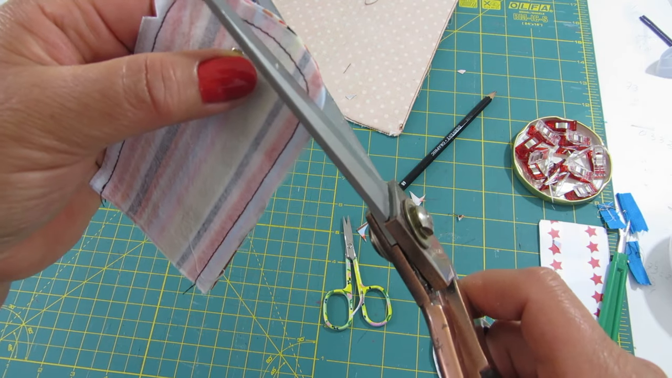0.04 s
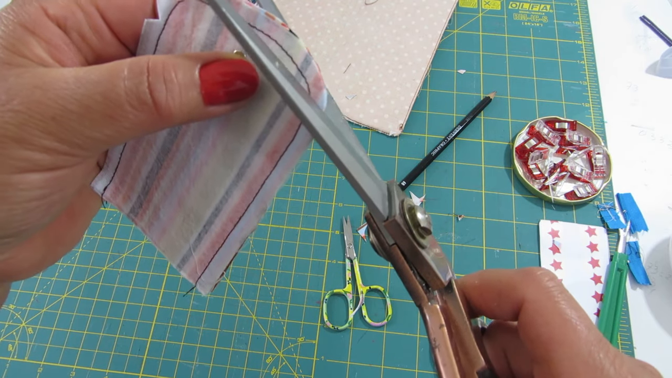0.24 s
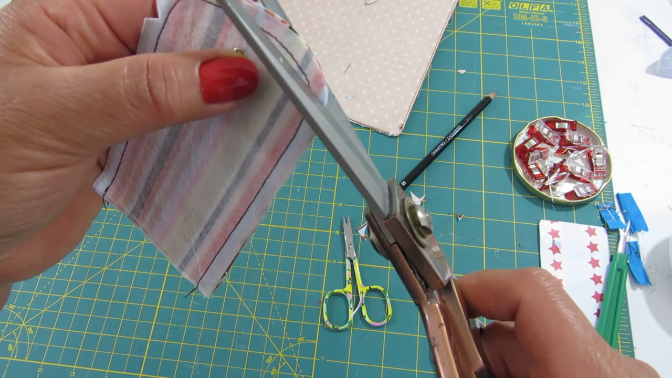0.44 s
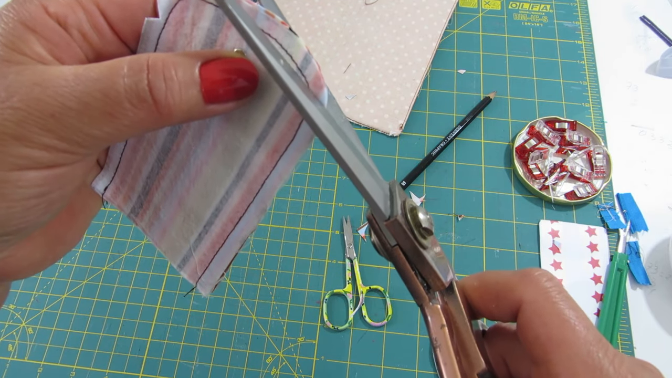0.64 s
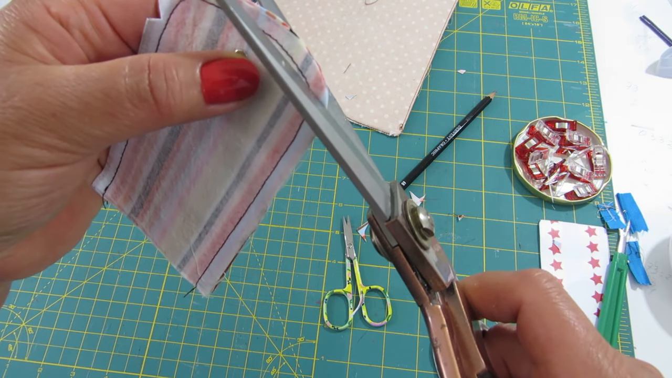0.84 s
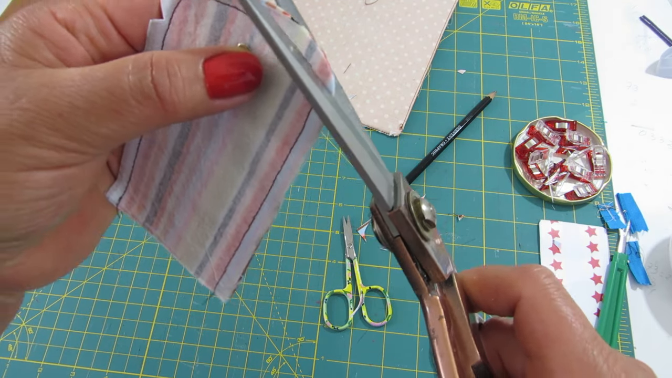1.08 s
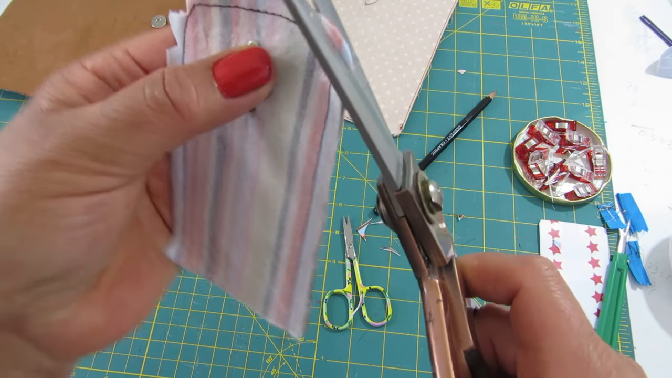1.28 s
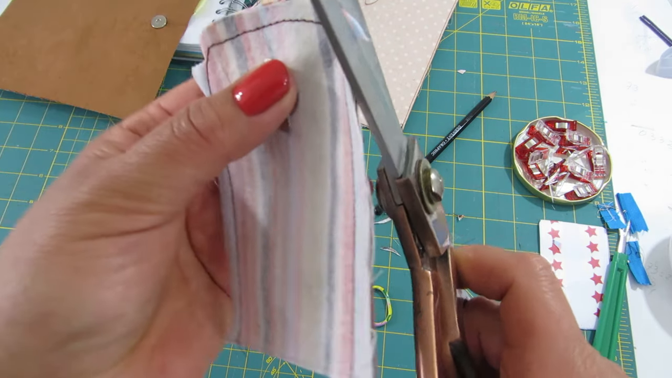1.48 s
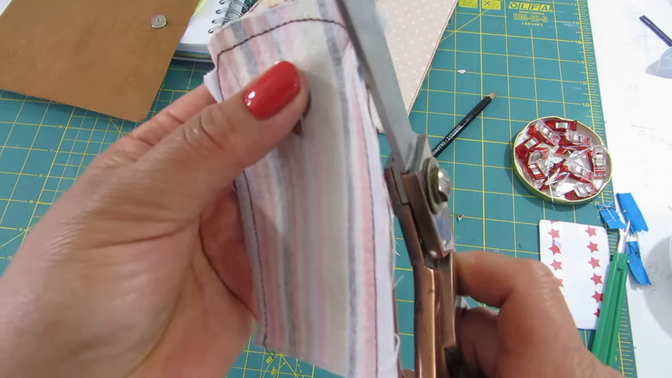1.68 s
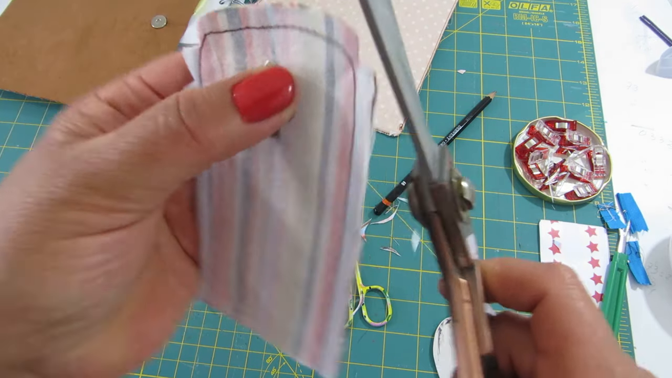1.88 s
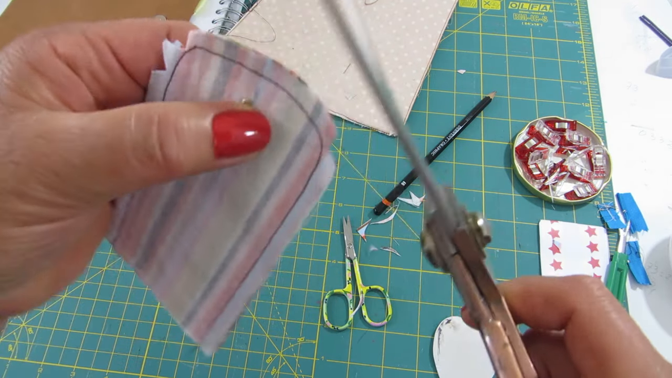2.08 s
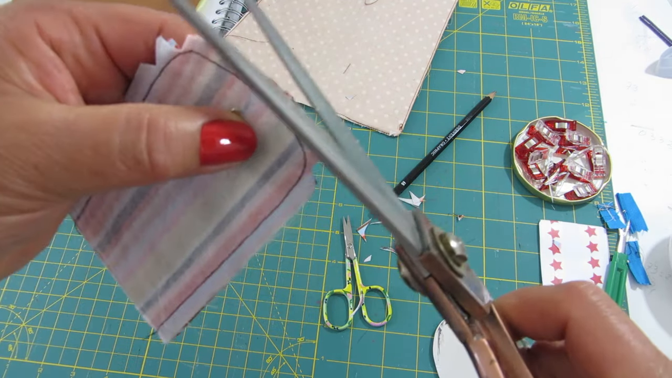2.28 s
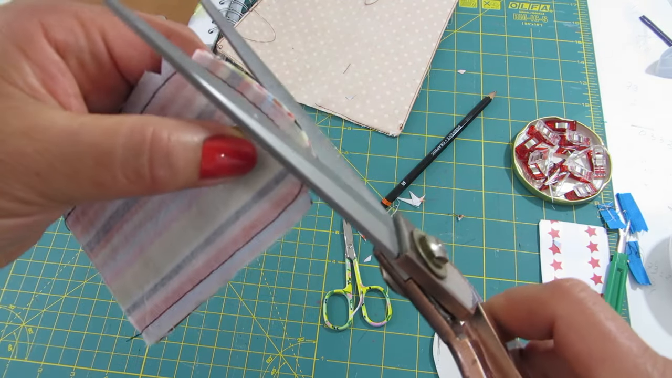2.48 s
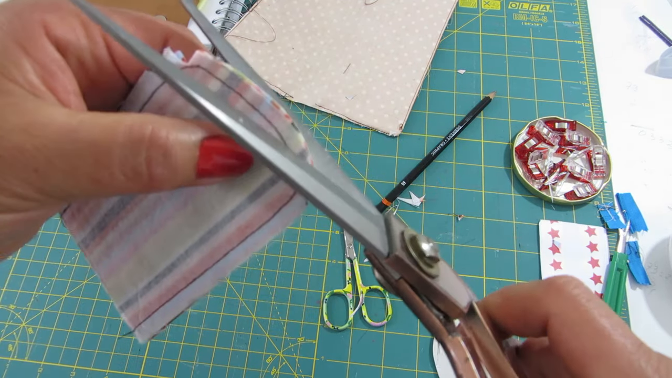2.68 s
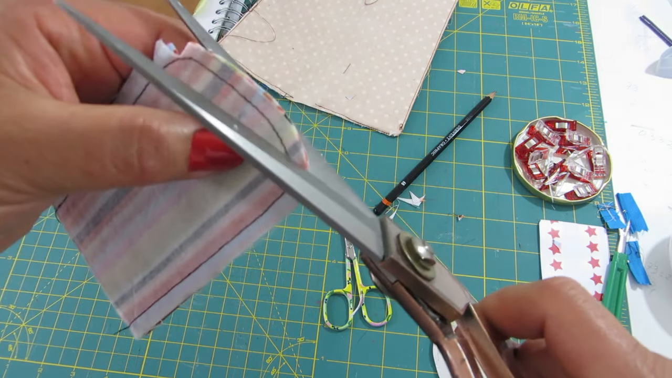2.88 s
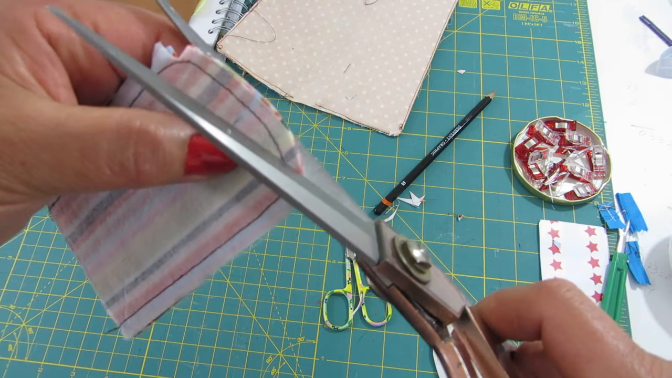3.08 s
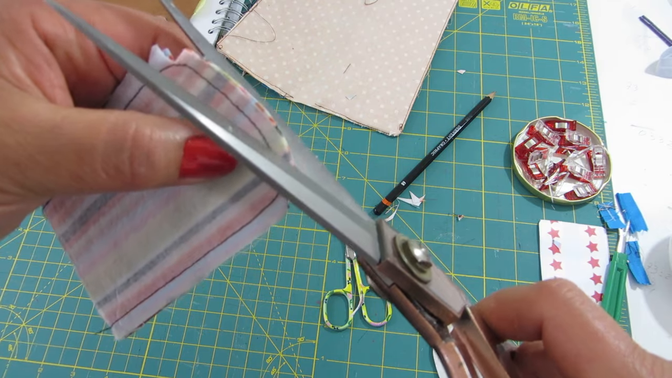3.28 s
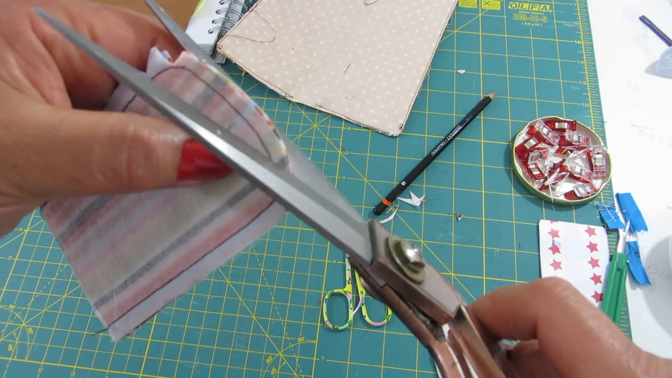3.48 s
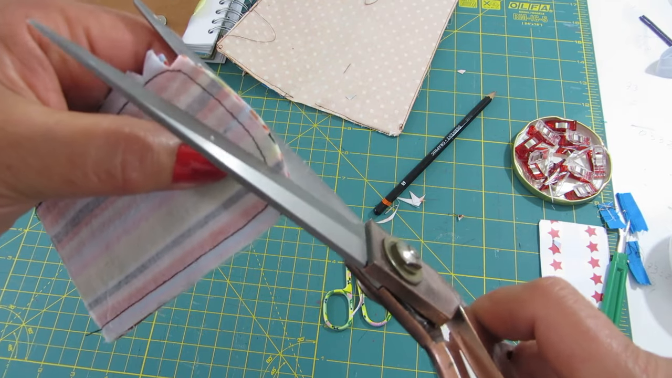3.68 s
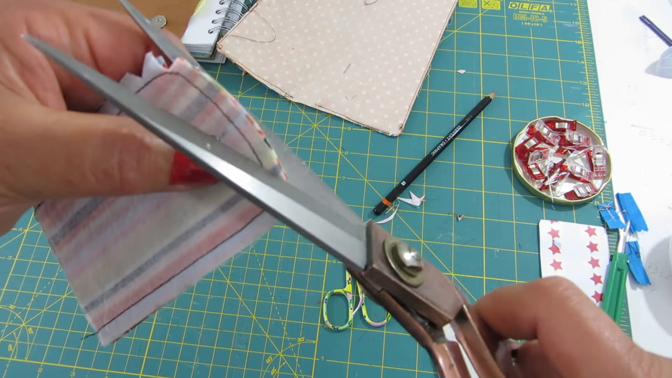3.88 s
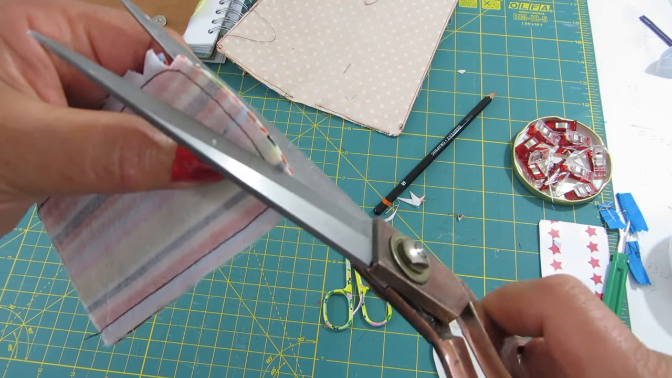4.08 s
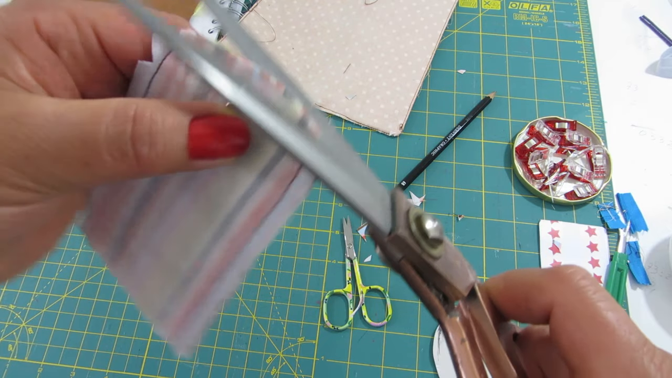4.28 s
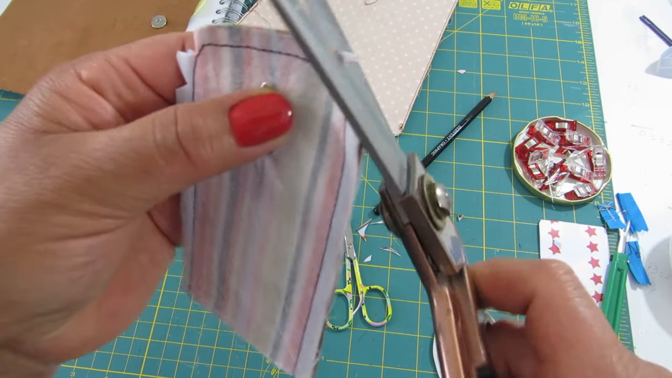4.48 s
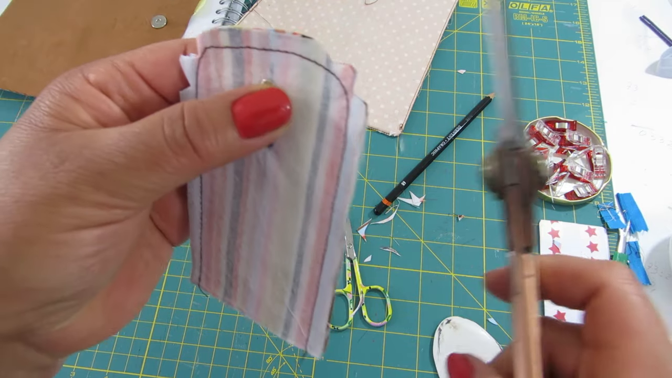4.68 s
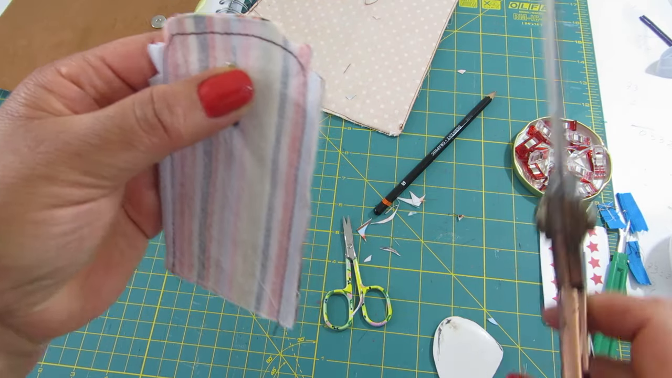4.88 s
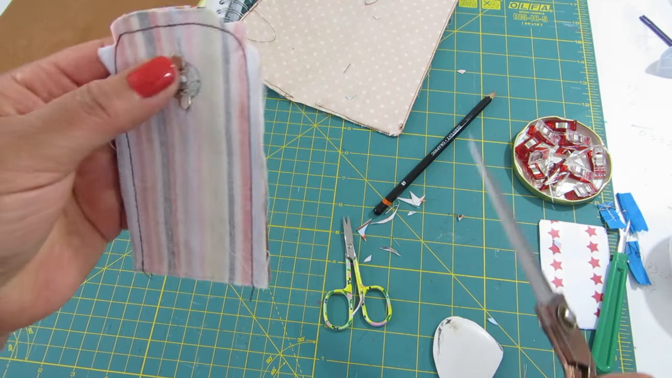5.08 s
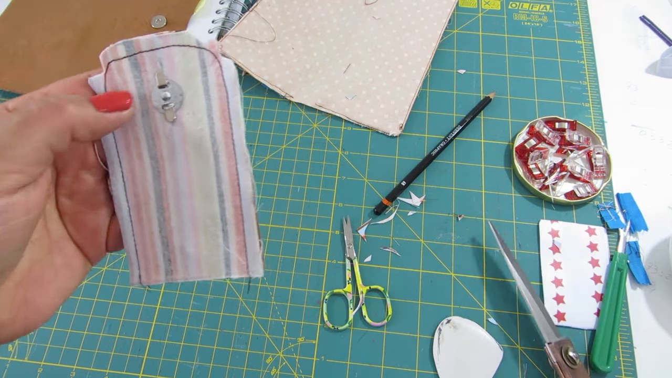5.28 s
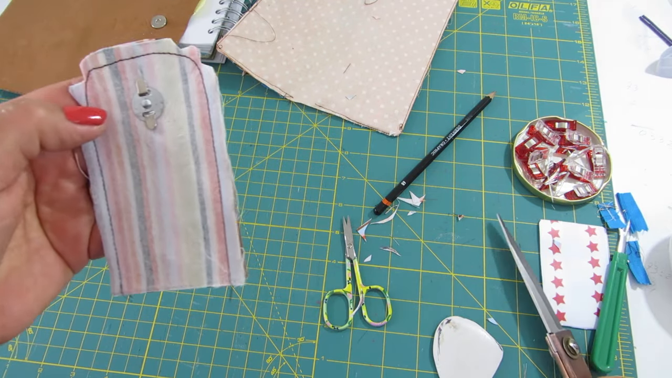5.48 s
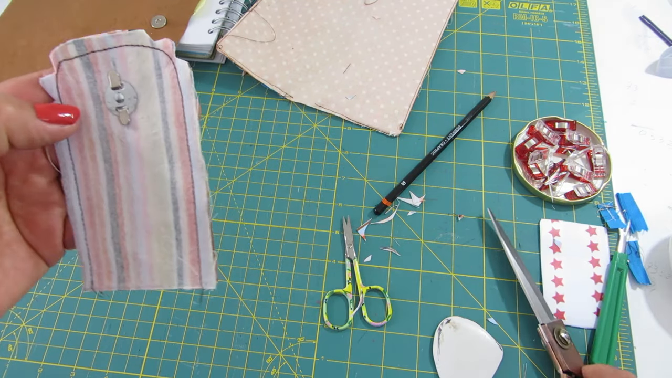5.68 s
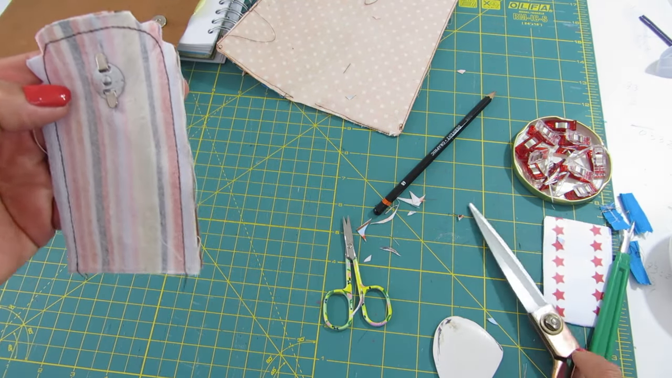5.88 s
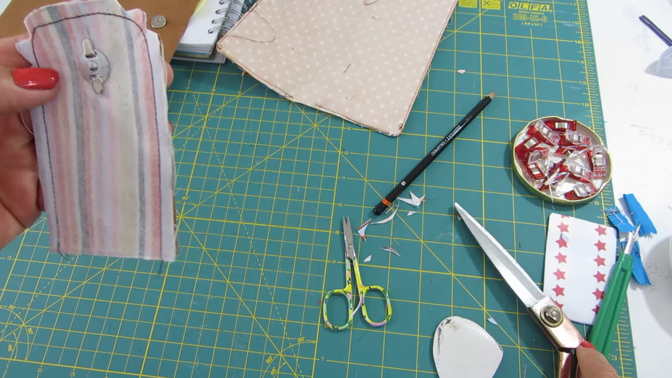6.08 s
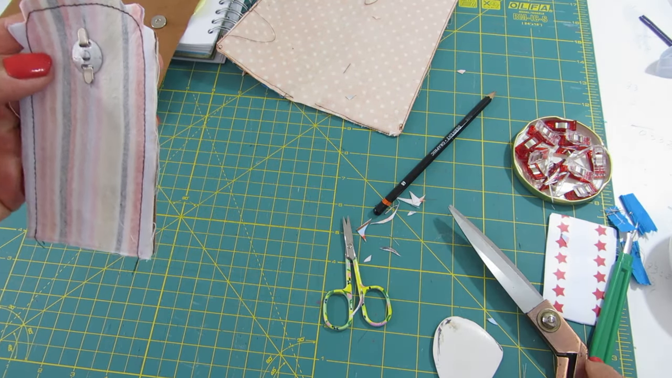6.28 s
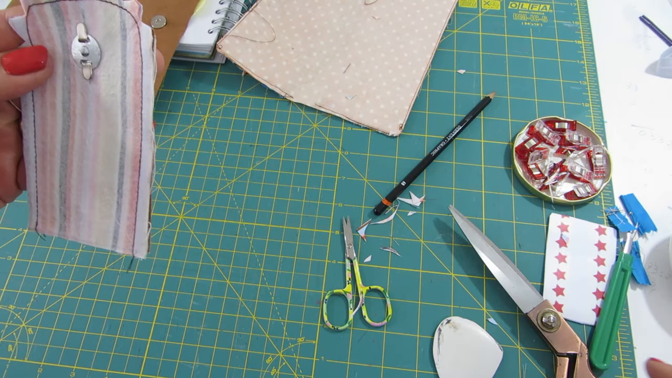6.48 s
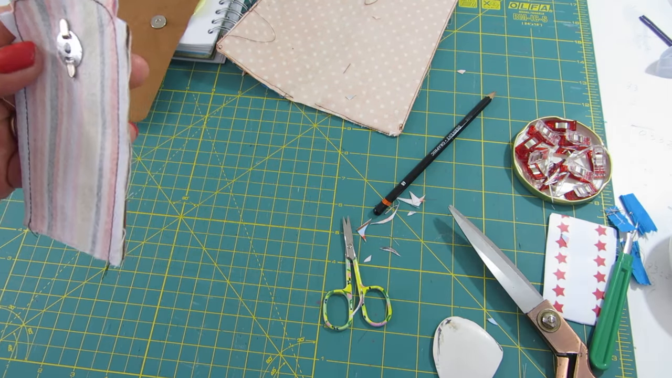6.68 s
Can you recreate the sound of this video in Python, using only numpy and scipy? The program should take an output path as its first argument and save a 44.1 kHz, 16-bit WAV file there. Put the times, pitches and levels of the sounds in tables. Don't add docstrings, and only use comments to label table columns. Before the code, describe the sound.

A small quiet room heard through a close stereo camera microphone: low fan air with a faint motor hum and soft hiss throughout. Around 0.4-0.8 s, steel shears nibble cotton in two quick clusters of thin, bright, grainy snips. Cloth rustles and ticks near 1.2-1.5 s, then a sharp crisp snap at 1.72 s, followed by a tiny descending pivot squeak at 1.9-2.0 s. Only light rustles and ticks until a longer run of ringing, crunchy bites at 3.8-4.13 s. Small clicks at 4.2-4.4 s lead to a hard tearing snip at 4.53-4.59 s. Fabric brushes softly, swelling at 5.4 s; a firm double thud of hands on the table comes at 5.6 s, with fainter bumps and rubbing after. At 6.26 s the shears hit the mat with a loud, hard, rattling clack, bouncing briefly with a short room tail. Faint rustle and ticks end it.

```python
import sys
import numpy as np
from scipy import signal
from scipy.fft import rfft, irfft
from scipy.io import wavfile

SR = 44100
rng = np.random.default_rng(int(sys.argv[2]) if len(sys.argv) > 2 else 0)


def pcm_store(signal):
    levels = np.round(np.clip(np.atleast_2d(signal), -1, 1) * 32767)
    wavfile.write(sys.argv[1], SR, levels.astype(np.int16).T)


def natural_amplitude(level_db):
    exponent = np.asarray(level_db, float) / 20
    return 10 ** exponent


N = 297366


def rms_one(x):
    return x / np.sqrt(np.mean(x ** 2) + 1e-20)


def at_hz(points, hz):
    table_hz, values = np.array(points).T
    return np.interp(np.log(hz), np.log(table_hz), values)


def over_time(points):
    return natural_amplitude(np.interp(np.arange(N) / SR, *np.transpose(points)))


def highpass(x, order, hz):
    return signal.sosfilt(signal.butter(order, hz, "high", fs=SR, output="sos"), x)


def bandpass(x, order, low_hz, high_hz):
    return signal.sosfilt(signal.butter(order, [low_hz, high_hz], "band", fs=SR, output="sos"), x)


def coloured(x, spectrum):
    hz = np.arange(1, len(x) // 2 + 2) * SR / len(x)
    shape = natural_amplitude(at_hz(spectrum, hz))
    return irfft(rfft(x) * rms_one(shape), len(x))


def resonance(x, hz, width_hz):
    r = np.exp(-np.pi * width_hz / SR)
    gain = np.sqrt((1 - r * r) / 2)
    poles = [1, -2 * r * np.cos(2 * np.pi * hz / SR), r * r]
    return signal.lfilter(gain * np.array([1, 0, -1]), poles, x)


def ring(clicks, hz, t60):
    r, w = natural_amplitude(-60 / (t60 * SR)), 2 * np.pi * hz / SR
    return signal.lfilter([0, np.sin(w)], [1, -2 * r * np.cos(w), r * r], clicks + 1e-18)


def grains(size, per_s, spread_db):
    heights = natural_amplitude(spread_db * np.minimum(rng.exponential(1, size), 4))
    signs = rng.choice([-1, 1], size)
    return rms_one(heights * signs * (rng.random(size) < per_s / SR))


# frequency in Hz, level in dB per Hz.
FAN_AIR = [(12, -37.5), (20, 10.5), (49, -24), (81, -17), (187, -15), (210, -11), (328, -14), (434, -15.5),
           (472, -18), (678, -6), (1190, -9.5), (1400, -8), (1710, -14.5), (11100, -25.5), (16000, -30.5)]
# frequency in Hz, width in Hz, level in dB.
MOTOR_LINES = [(221, 2.8, -74), (442.5, 4.9, -74), (670, 9.7, -68), (850, 10, -83.5), (1388, 14, -71),
               (1940, 11, -77.5)]
# time in seconds, level in dB.
RUMBLE_COURSE = [(0.0, -62), (0.09, -79), (1.01, -72), (2.76, -74), (4.35, -69.5), (4.52, -74.5),
                 (5.42, -65), (5.46, -71), (5.59, -57), (5.84, -64.5), (6.65, -64.5), (6.74, -73)]


def fan():
    t = np.arange(N) / SR
    air = highpass(coloured(rng.standard_normal(N), FAN_AIR), 4, 68)
    out = natural_amplitude(-57) * air
    for hz, width_hz, db in MOTOR_LINES:
        rough = resonance(rng.standard_normal(N), hz, width_hz)
        steady = np.sin(2 * np.pi * hz * t)
        out += natural_amplitude(db) * (0.82 * rough + 0.72 * steady)
    rumble = rms_one(bandpass(rng.standard_normal(N), 3, 36, 56))
    return out + over_time(RUMBLE_COURSE) * rumble


# frequency in Hz, level in dB per Hz.
HISS_SPECTRUM = [(12, -33), (20, -1), (98, -5.5), (187, -2), (388, -2), (513, -3), (738, 0.5), (1570, -3.5),
                 (6180, -16), (16000, -30)]


def capsule_hiss():
    return natural_amplitude(-46.5) * coloured(rng.standard_normal(N), HISS_SPECTRUM)


def swells(rows, rising):
    out, offsets = np.zeros(N), np.arange(-SR // 2, SR // 2)
    ms = offsets * 1000 / SR
    away = np.where(ms < 0, -ms / rising, ms / (1 - rising))
    for s, level_db, length_ms in rows:
        at = round(s * SR) + offsets
        inside = (at >= 0) & (at < N)
        out[at[inside]] += natural_amplitude(level_db - 5 * away / length_ms)[inside]
    return out


# time in seconds, level in dB.
STIR_COURSE = [(0.0, -74), (1.1, -73), (1.3, -74), (2.2, -73.5), (3.1, -74.5), (3.6, -85), (4.2, -72.5),
               (4.7, -68), (5.5, -68.5), (6.24, -71.5), (6.5, -68), (6.74, -68)]
# peak in seconds, level in dB, ms per 5 dB of rise and fall together.
CLOTH_BRUSHES = [(1.189, -65, 36), (1.397, -49.5, 20), (1.474, -55, 10), (1.491, -51.5, 14),
                 (1.855, -63, 60), (1.91, -65, 35), (2.824, -56, 16), (3.177, -60, 14), (3.255, -65, 35),
                 (3.44, -62.5, 70), (4.29, -57.5, 65), (4.34, -57, 14), (4.62, -55, 11), (4.973, -58, 24),
                 (5.194, -61, 212), (5.384, -63, 21), (5.44, -48, 27), (5.476, -69, 27), (5.679, -73, 152),
                 (5.775, -61, 4), (5.893, -49, 2.5), (5.98, -54, 92), (6.611, -69, 42), (6.695, -70, 30),
                 (6.737, -64, 58)]
# peak in seconds, level in dB, ms per 5 dB as above.
DULL_RUBS = [(1.397, -61, 13), (1.531, -78, 80), (1.85, -70, 80), (2.011, -82, 80), (2.85, -68, 60),
             (3.177, -62.5, 38), (3.255, -74, 31), (3.4, -61.5, 58), (4.318, -62, 20), (4.62, -53, 27),
             (5.384, -47, 10), (5.45, -56.5, 58), (5.893, -55.5, 24), (5.995, -54, 130)]
# frequency in Hz, level in dB per Hz.
CLOTH_SPECTRUM = [(1060, -36), (1800, -7), (2920, -3), (3170, -3.5), (4290, -3.5), (4830, -2), (11400, -13),
                  (16000, -25)]


def rustle():
    stir = over_time(STIR_COURSE)
    bright = stir + swells(CLOTH_BRUSHES, rising=0.36)
    dull = natural_amplitude(3.5) * stir + swells(DULL_RUBS, rising=0.33)
    weave = coloured(grains(N, per_s=6000, spread_db=3.5), CLOTH_SPECTRUM)
    rub = rms_one(bandpass(grains(N, per_s=1000, spread_db=-0.5), 2, 250, 1800))
    return bright * weave + dull * rub


# frequency in Hz, level in dB per Hz.
TEAR_SPECTRUM = [(180, -57), (300, -20.5), (885, -18), (1250, -7.5), (4910, -4), (5700, -12.5),
                 (6520, -5.5), (7440, -11), (16000, -16.5)]


def cut(bites, rings, glide, widen, tear_db, tear_slope):
    out, size = np.zeros(N), 8192
    ms = (np.arange(size) - size // 4) * 1000 / SR
    times = np.array(bites)[:, 0]
    _, _, ring_db, shift_db = np.transpose(rings)
    climb_hz_per_s = 6000 * np.broadcast_to(glide, len(rings))
    for s, level_db, length_ms, rising in bites:
        late = s - times.mean()
        uneven_db = 1.5 * rng.standard_normal(len(rings))
        strength = rms_one(natural_amplitude(uneven_db + ring_db + shift_db * late / np.ptp(times)))
        strength = strength / np.sqrt(len(rings))
        rise = np.clip(rising, .05, .95) * length_ms
        fall = np.clip(1 - rising, .05, .95) * length_ms
        envelope = natural_amplitude(level_db - 4.86 * np.where(ms < 0, -ms / rise, ms / fall))
        swarm = grains(size, per_s=8000, spread_db=1.8) * envelope
        bite = natural_amplitude(tear_db + tear_slope * (level_db + 45.5)) * coloured(swarm, TEAR_SPECTRUM)
        for k, (hz, width_hz, *_) in enumerate(rings):
            moved_hz = hz + climb_hz_per_s[k] * late
            blade = resonance(swarm, moved_hz, widen * width_hz + 0.0043 * hz)
            bite += (-1) ** k * strength[k] * blade
        start = round(s * SR) - size // 4
        out[start:start + size] += bite
    return out


# peak in seconds, level in dB,
# ms per 5 dB of rise and fall together, share of that spent rising (0-1).
FIRST_BITES = [
    (0.392, -55, 7, .2),
    (0.415, -56, 12, 0.7),
    (0.43, -44.5, 10, 0.4),
    (0.4535, -43, 4, 0.23),
    (0.468, -45, 6, 0.5),
    (0.4765, -40.5, 9, 0.5),
    (0.488, -45, 1, 0.5),
]
SECOND_BITES = [(0.588, -51, 6, .3), (0.5995, -39, 5.6, 0.4), (0.635, -48, 12, 0.33),
                (0.648, -48, 6.5, 0.44), (0.657, -40.5, 6.4, 0.55), (0.72, -50.5, 16, 0.23),
                (0.7475, -41, 7.1, 0.15), (0.765, -55, 10, .4), (0.782, -58, 12, .5),
                (0.816, -48, 8.9, 0.66), (0.83, -55, 6, .4)]
FIRST_SNAP_BITES = [
    (1.7032, -49, 2.3, .1),
    (1.716, -59, 2.5, .5),
    (1.7235, -28, 1.94, 0.35),
    (1.7265, -35, 3.5, 0.45),
    (1.7305, -36.5, 3.9, 0.32),
    (1.735, -40, 7.1, .45),
    (1.7408, -33, 2.0, 0.7),
    (1.749, -47, 11, 0.47),
]
THIRD_BITES = [(3.815, -56, 12, .4), (3.835, -50.5, 13, .6), (3.8495, -41, 5, 0.57), (3.861, -48, 5, 0.46),
               (3.883, -43, 6, 0.34), (3.893, -49, 6, 0.4), (3.905, -52, 14, 0.41),
               (3.943, -41.5, 12, 0.52), (3.972, -50, 9, .7), (3.996, -51, 16, .5), (4.02, -50, 8, 0.46),
               (4.03, -45.5, 8.7, 0.45), (4.058, -53, 5, .6), (4.084, -50, 8.9, .4),
               (4.105, -44, 5.5, 0.18), (4.112, -45, 7.8, 0.58), (4.122, -45, 5, .5),
               (4.13, -43.5, 9, 0.46)]
SECOND_SNAP_BITES = [(4.533, -43, 3.2, 0.34), (4.5415, -35.5, 4.4, .5), (4.5455, -32.5, 3.5, 0.57),
                     (4.5505, -32, 3.5, 0.53), (4.5545, -32, 2.6, 0.68), (4.5575, -38, 2.2, .5),
                     (4.5602, -31, 1.8, 0.98), (4.565, -59, 8, .5), (4.5703, -34, 2.2, 0.2),
                     (4.572, -28.5, 2.2, 0.3), (4.575, -27, 2.4, 0.41), (4.579, -30.5, 2.2, 0.42),
                     (4.5825, -33, 2.5, 0.65), (4.588, -38, 3.0, .7), (4.6, -60, 12, .4)]
# frequency in Hz, width in Hz,
# level in dB, gain over the whole cut in dB.
FIRST_BLADES = [(4375, 34, -25, 0.1), (5550, 130, -8, 5), (6040, 65, -6, -1), (6550, 91, -4.5, -1),
                (7140, 120, -12, -3), (8340, 34, -3, 0), (9200, 120, -21, 0.1), (12300, 500, -13, 6),
                (14700, 180, -16, 3), (15600, 240, -24, 0.1)]
SECOND_BLADES = [(5700, 260, -8, -3), (6710, 95, 4.5, 1), (7400, 80, -9, -3), (8340, 150, -1.5, -1),
                 (9260, 120, -15, 4), (11700, 200, -20, 0.1), (13000, 300, -12, -2), (14200, 200, -20, 0.1),
                 (15000, 120, -14, 0.1)]
FIRST_SNAP_BLADES = [(805, 540, -11, -6), (2105, 390, 8, 13), (3300, 1700, 6.5, 2), (4760, 350, -9, -6),
                     (6220, 390, 12, -9), (8050, 740, 15, -11), (9200, 350, 9, 0.1), (11700, 400, 7.5, 0),
                     (13800, 900, -3, 0.1)]
THIRD_BLADES = [(3330, 60, -16, 4), (4400, 54, -9, -4), (5000, 60, -10, -4), (5510, 80, 3, -6),
                (6430, 66, -5, 1), (6940, 64, 1, 6), (7350, 46, -2, 5), (7900, 60, -2.5, -2),
                (8660, 42, -7, -2), (9030, 43, -5.5, 2), (10050, 150, -15, -10), (12000, 200, -5, 0.1),
                (13300, 120, -8, -2), (14850, 100, -13, 4)]
SECOND_SNAP_BLADES = [(890, 170, -13.5, -2), (2600, 380, -8, 14), (4800, 720, -7.5, 4),
                      (6540, 270, 1.5, -8), (8240, 610, -6.5, -5), (9340, 300, -5.5, 3),
                      (11900, 400, -14.5, 5), (13000, 360, -9, -11), (15000, 500, -12, 0.1)]
THIRD_CLIMB = [.1, .15, .2, 0.24, .15, .12, 0.11, .12, .2, 0.17, .17, .2, .3, .17]


def shears_cutting():
    out = cut(FIRST_BITES, FIRST_BLADES, glide=.05, widen=1.0, tear_db=-13.5, tear_slope=0.34)
    out += cut(SECOND_BITES, SECOND_BLADES, glide=0.071, widen=1.7, tear_db=-13.0, tear_slope=0.32)
    out += cut(FIRST_SNAP_BITES, FIRST_SNAP_BLADES, glide=.01, widen=0.61, tear_db=-4.5, tear_slope=0.23)
    out += cut(THIRD_BITES, THIRD_BLADES, glide=THIRD_CLIMB, widen=1.0, tear_db=-11, tear_slope=0.17)
    out += cut(SECOND_SNAP_BITES, SECOND_SNAP_BLADES, glide=0.012, widen=0.73, tear_db=-9, tear_slope=0.05)
    return out


def ticks(rows, damping, edge):
    size = 4096
    out, n = np.zeros(N + size), np.arange(size)
    for s, peak_db, hz in rows:
        sign = rng.choice([-1, 1])
        second = int(8 + 20 * rng.random())
        click = sign * ((n == 0) + .5 * (n == second))
        tick = resonance(click, hz, damping * hz) + edge * bandpass(click, 1, 1500, 11000)
        start = round((s + 0.00065) * SR)
        out[start:start + size] += natural_amplitude(peak_db) * tick / np.abs(tick).max()
    return out[:N]


# time in seconds, peak in dB, centre in Hz.
SMALL_TICKS = [(1.1797, -38, 4860), (1.3834, -38, 3270), (1.3897, -29.5, 5570), (1.5308, -39, 3330),
               (1.391, -34, 1290), (1.615, -43, 3530), (1.7402, -24, 3300), (1.7228, -22, 7800),
               (1.7226, -25, 6200), (1.1797, -41, 10500), (2.8315, -40, 6000), (3.881, -40, 5400),
               (4.5742, -30, 5000), (2.0381, -36, 3730), (2.175, -41.5, 4830), (2.831, -37, 3120),
               (3.2744, -44, 5000), (4.2266, -37, 4870), (4.253, -34.5, 8150), (4.2686, -33, 5150),
               (4.2892, -28, 5000), (4.2954, -37, 4860), (4.3345, -31, 7050), (4.329, -41, 6000),
               (4.3504, -42, 4830), (4.3564, -43, 4500), (4.346, -40, 8000), (4.3845, -43, 9500),
               (4.385, -48, 4200), (4.4944, -40, 3000), (4.8636, -38, 3900), (5.1241, -36.5, 6600),
               (5.3764, -34, 3800), (5.6005, -28, 4360), (5.6054, -28, 2930), (5.6115, -32, 2250),
               (5.684, -39, 5700), (5.692, -38, 6500), (5.8849, -39, 3200), (5.9478, -34, 3520),
               (5.941, -42, 4000), (5.889, -36.5, 4800), (5.886, -38, 1400), (5.949, -44, 1940),
               (5.975, -43, 3000), (6.0, -39, 2200), (6.03, -39, 2600), (6.06, -43, 1820),
               (6.69, -40, 3920), (6.7204, -42, 4320)]
# time in
# seconds, peak in dB, centre in Hz.
DULL_KNOCKS = [(1.3895, -46, 1890), (1.517, -40.5, 890), (1.5215, -42, 890), (1.859, -40.5, 3080),
               (2.0928, -40, 3060), (1.7235, -34, 780), (1.7245, -49, 520), (3.25, -43, 950),
               (2.831, -42, 805), (4.2895, -36.5, 1280), (4.5752, -30, 2570), (1.678, -44, 13000),
               (4.28, -40, 7100), (6.105, -35.5, 1230), (6.11, -41, 1240), (6.116, -39.5, 1250),
               (6.521, -49, 217), (5.67, -52, 138), (6.12, -53, 138), (6.553, -43.5, 203),
               (6.597, -47.5, 204), (6.6905, -39, 900), (6.7205, -38, 1340)]
# time in seconds, peak in dB, centre in Hz.
PIVOT_SQUEAKS = [
    (1.899, -52, 9500),
    (1.906, -47, 8950),
    (1.912, -50, 8750),
    (1.926, -50, 8300),
    (1.962, -52, 6500),
    (1.974, -50, 5800),
    (1.99, -52, 5900),
]


def small_contacts():
    out = ticks(SMALL_TICKS, damping=0.24, edge=0.1)
    out += ticks(DULL_KNOCKS, damping=0.14, edge=0)
    out += ticks(PIVOT_SQUEAKS, damping=0.02, edge=0)
    return out


def one_cycle(size, hz):
    u = 2 * np.pi * 1.12 * hz * np.arange(size) / SR - np.pi
    return highpass(-u * np.exp(-.5 * u ** 2), 1, 0.36 * hz)


# frequency in Hz, level in dB, t60 in seconds.
TABLE_MODES = [(136, -22, 0.32), (239.6, -27, 0.08), (345, -28, 0.04), (460, -32.5, 0.1),
               (540, -32.5, 0.089), (620, -39, 0.1), (698, -29, 0.09), (831, -34.5, 0.089),
               (1057, -28.5, 0.037), (1280, -31, 0.022), (1550, -30.5, 0.013), (1880, -25, 0.017)]


def table(blows):
    size = 22050
    out = np.zeros(N + size)
    for s, level_db, contact_hz in blows:
        push = one_cycle(size, contact_hz) + 0.16 * one_cycle(size, 2.5 * contact_hz)
        push = push / np.abs(push).max()
        thud = push.copy()
        for hz, db, t60 in TABLE_MODES:
            thud += natural_amplitude(db) * hz / 2000 * ring(push, hz, t60)
        start = round(s * SR)
        out[start:start + size] += natural_amplitude(level_db) * thud
    return out[:N]


# time in seconds, level in dB, contact frequency in Hz.
SOFT_BLOWS = [(1.7228, -40.5, 566), (1.7411, -45, 600), (4.5748, -43.5, 335), (4.622, -47.5, 198),
              (5.375, -43.5, 240), (5.384, -47, 294), (5.6015, -23.5, 440), (5.6048, -25, 480),
              (5.6075, -31, 496), (5.6095, -23, 332), (5.6141, -27, 595), (5.616, -39, 613),
              (5.6236, -31.5, 620), (5.851, -54, 288), (5.889, -54, 390), (5.947, -49, 228),
              (5.99, -54, 300), (6.051, -53, 350), (6.096, -53, 322), (6.127, -51.5, 296)]
# time in seconds, level in dB, contact frequency in Hz.
MAT_PRESSED = [
    (6.2555, -15, 380),
]
# time in seconds, level in dB, contact frequency in Hz.
MAT_REBOUND = [
    (6.2658, -16, 380),
]


def thuds():
    mat = table(MAT_PRESSED) - table(MAT_REBOUND)
    return highpass(table(SOFT_BLOWS), 2, 85) + highpass(mat, 2, 240)


# time in seconds, level in dB, sign of the push,
# brightness in dB per octave.
BOUNCES = [(6.2559, -1, 1, 4), (6.257, -3.5, 1, 4), (6.2585, -5, 1, 0.5), (6.2605, -7, -1, -0.5),
           (6.2612, -14.5, 1, -2), (6.264, 0, 1, 4.5), (6.2654, -7.5, 1, 4), (6.2665, 1.8, 1, 3),
           (6.2689, -12.5, 1, -6), (6.2716, -4.5, -1, -1.5), (6.275, -9, -1, -4), (6.2805, -14, 1, -6.5),
           (6.2868, -13, 1, 0), (6.2934, -16.5, -1, -1)]
# frequency in Hz, level in dB, t60 in seconds.
SHEARS_MODES = [(665, -27, 0.035), (832, -18, 0.035), (950, -18, 0.04), (1120, -14.5, 0.04),
                (1236, -23, 0.04), (1525, -16, 0.03), (1760, -24, 0.037), (1935, -16.5, 0.026),
                (2250, -11.5, 0.018), (2600, -26.5, 0.02), (2790, -20, 0.021), (2960, -19, 0.013),
                (4440, -27, 0.017), (5900, -29, 0.0116)]


def clack():
    s, level_db, sign, tilt_db = np.transpose(BOUNCES)
    at = np.round(s * SR).astype(int)
    clicks = np.zeros(N)
    clicks[at] = sign * natural_amplitude(level_db)
    out = 7.5 * bandpass(clicks, 4, 600, 3000)
    decay = natural_amplitude(-np.arange(1024) * 0.1)
    crack = np.convolve(np.abs(clicks), decay)[:N] * rng.standard_normal(N)
    out += natural_amplitude(-19.5) * bandpass(crack, 1, 4000, 13000)
    out += natural_amplitude(-2.5) * bandpass(crack, 2, 550, 3300)
    for hz, db, t60 in SHEARS_MODES:
        uneven_db = rng.normal(0, 3, len(at))
        clicks[at] = sign * natural_amplitude(level_db + db + tilt_db * np.log2(hz / 1800) + uneven_db)
        out += ring(clicks, hz, t60)
    return highpass(out, 3, 420)


# frequency in Hz, t60 in seconds.
ROOM_DECAY = [(100, 0.27), (500, 0.27), (2500, 0.25), (6000, 0.2), (15000, 0.16)]


def room(x):
    size, edges = 16384, 60 * 2. ** np.arange(0, 8.4, .5)
    t = np.arange(size) / SR
    tails = np.zeros((2, size))
    white = rng.standard_normal((2, 2, size))
    for k, (low, high) in enumerate(zip(edges, edges[1:])):
        t60 = at_hz(ROOM_DECAY, np.sqrt(low * high))
        tails += bandpass(white[k % 2], 2, low, high) * natural_amplitude(-60 * t / t60)
    tails *= np.clip((t - .003) / 0.0047, 0, 1)
    tails /= np.sqrt(np.sum(tails[0] ** 2))
    return signal.fftconvolve(x[None], tails)[:, :N]


def lower_hands(held):
    lowered = np.clip((np.arange(N) / SR - 5.25) / 0.1, 0, 1)
    return held - lowered * highpass(held, 1, 9000)


def scene():
    held = lower_hands(rustle() + shears_cutting() + small_contacts())
    blows, steel = thuds(), clack()
    sent = natural_amplitude(-13) * held + natural_amplitude(-12.5) * highpass(blows, 2, 380) + natural_amplitude(-8.0) * steel
    tail, spread = room(sent)
    mid = held + blows + steel + tail
    lows = bandpass(mid, 1, 140, 520)
    side = 0.39 * lows - 0.04 * np.diff(mid, prepend=0) - 0.23 * np.gradient(mid)
    side += natural_amplitude(-13.5) * (spread + 0.74 * np.diff(spread, prepend=0))
    side += capsule_hiss()
    mid = mid + fan()
    return np.array([mid + side, mid - side])


def band_limit(x):
    return signal.sosfilt(signal.butter(12, 16500, fs=SR, output="sos"), x)


def record(dry):
    t = np.arange(N) / SR
    peak_db = 20 * np.log10(np.abs(dry).max(axis=0) + 1e-9)
    over_db = 0.34 * np.maximum(peak_db + 16, 0)
    duck_db = np.maximum.accumulate(over_db + 14 * t) - 14 * t
    r = np.exp(-1 / (0.0055 * SR))
    ducked = dry * natural_amplitude(-signal.lfilter([1 - r], [1, -r], duck_db))
    rounded = 0.97 * np.tanh(ducked / 0.97)
    mix = signal.sosfilt(signal.cheby2(20, 60, 16150, fs=SR, output="sos"), rounded)
    return band_limit(mix)


dry = scene()
out = record(dry)
pcm_store(out)
```